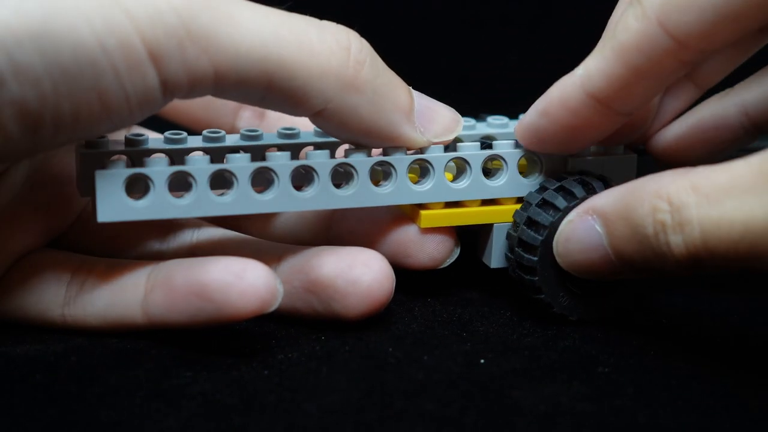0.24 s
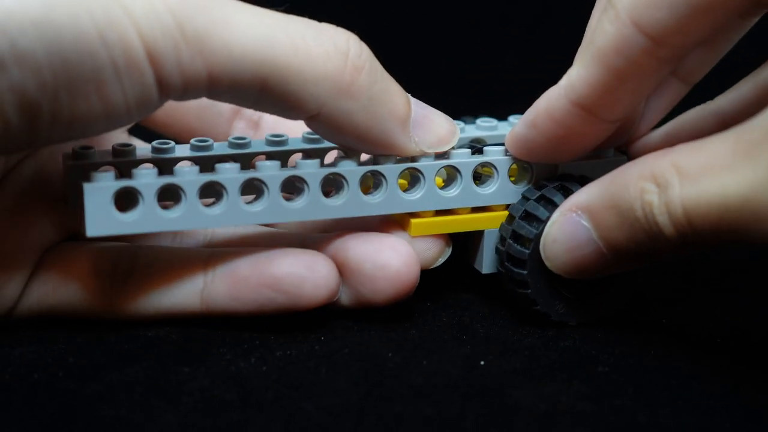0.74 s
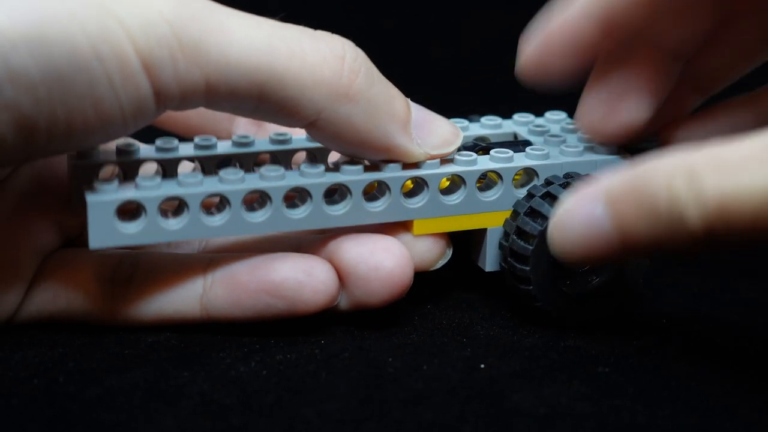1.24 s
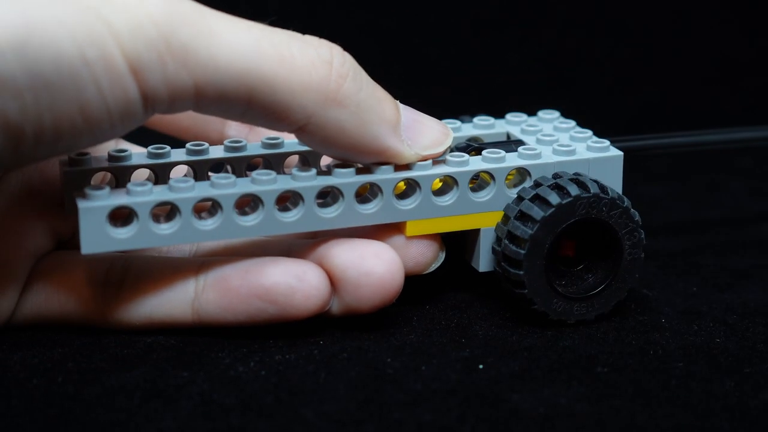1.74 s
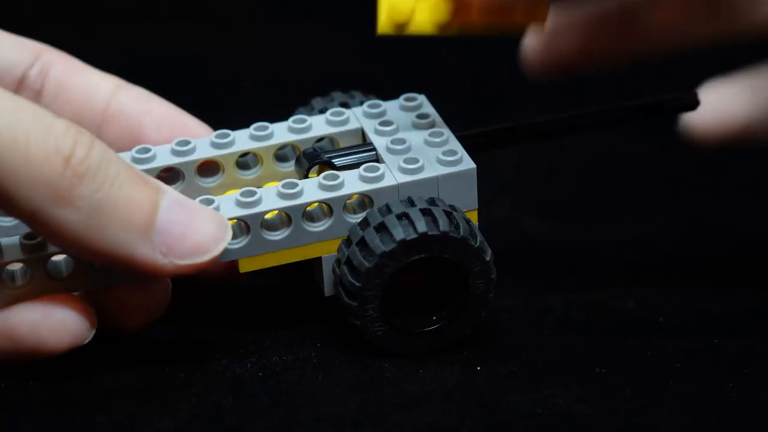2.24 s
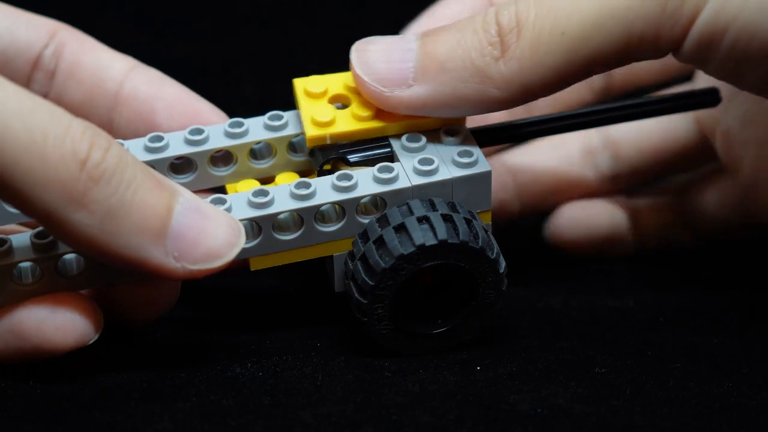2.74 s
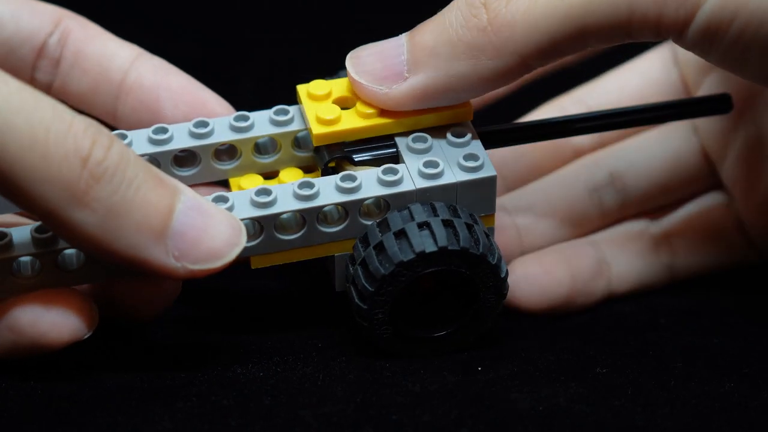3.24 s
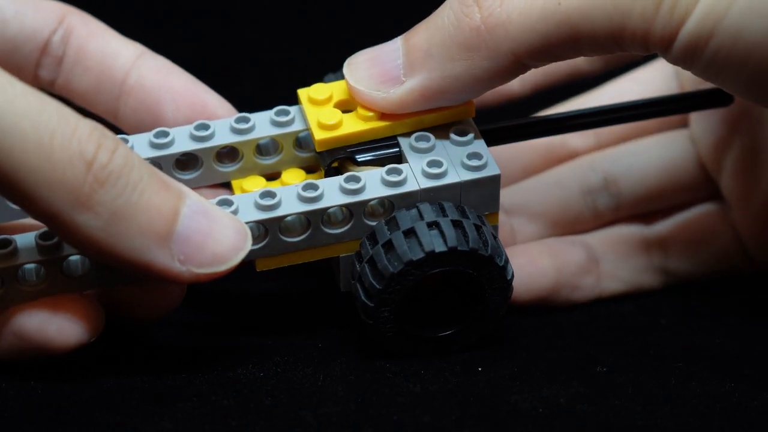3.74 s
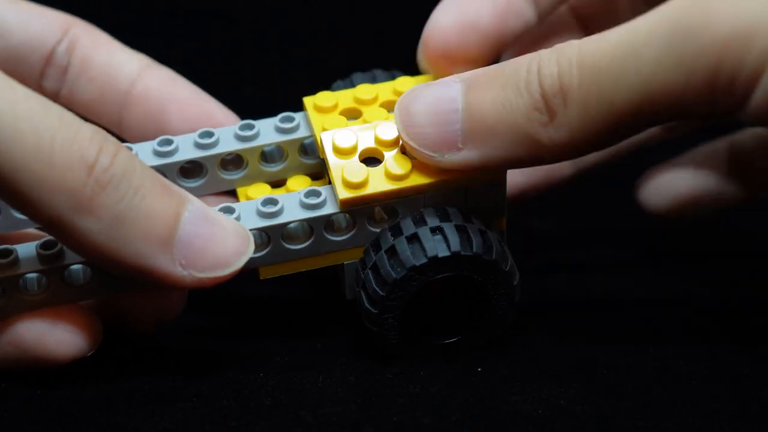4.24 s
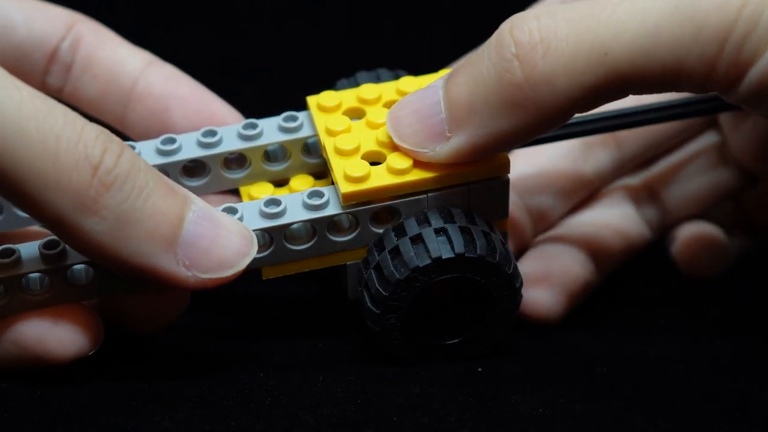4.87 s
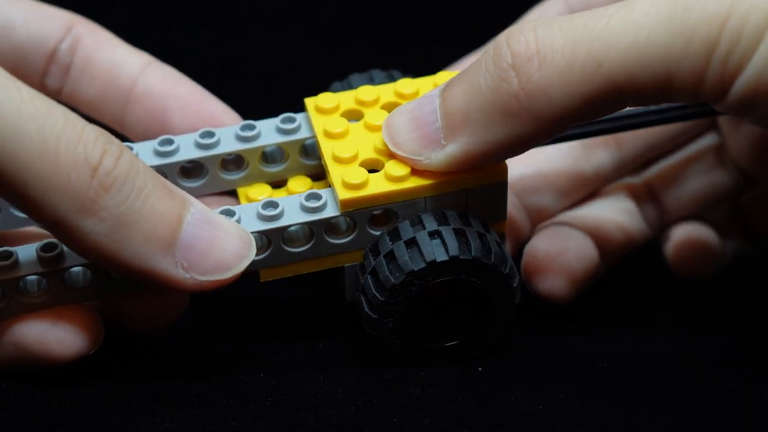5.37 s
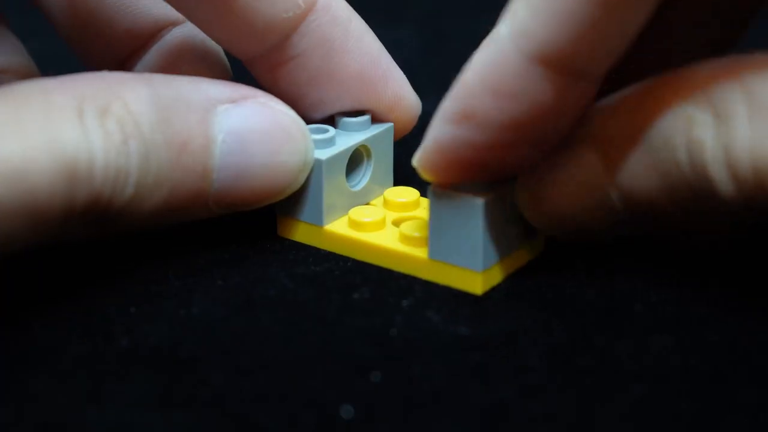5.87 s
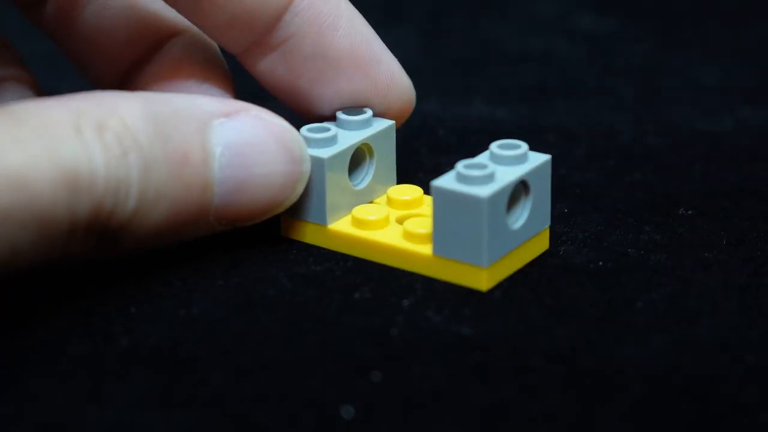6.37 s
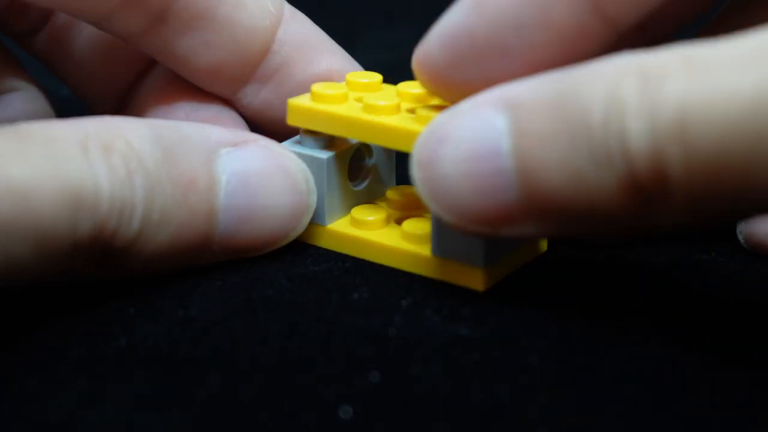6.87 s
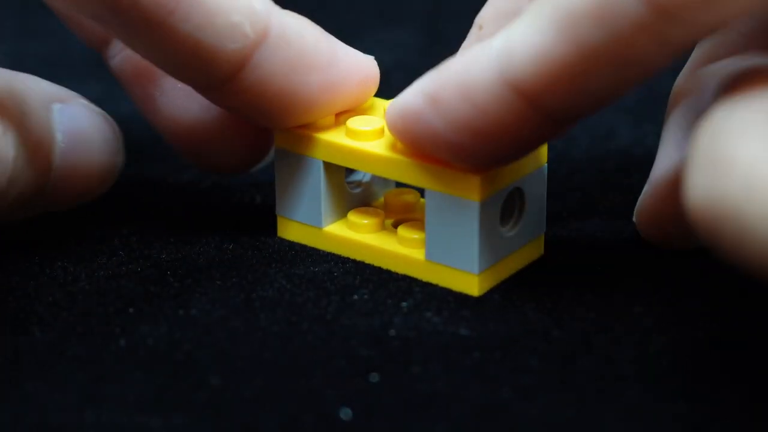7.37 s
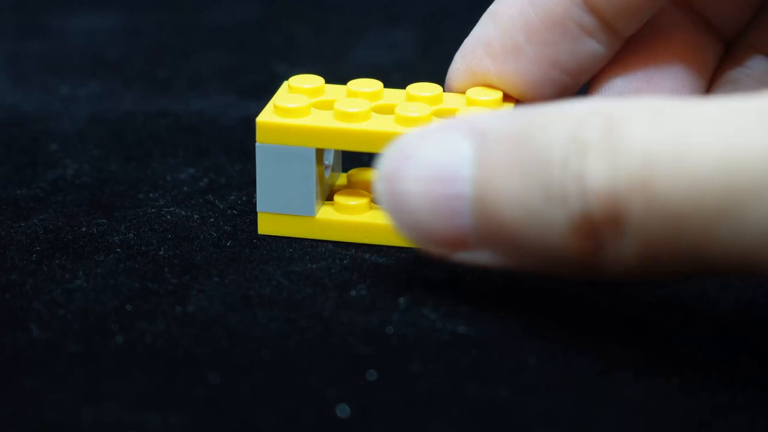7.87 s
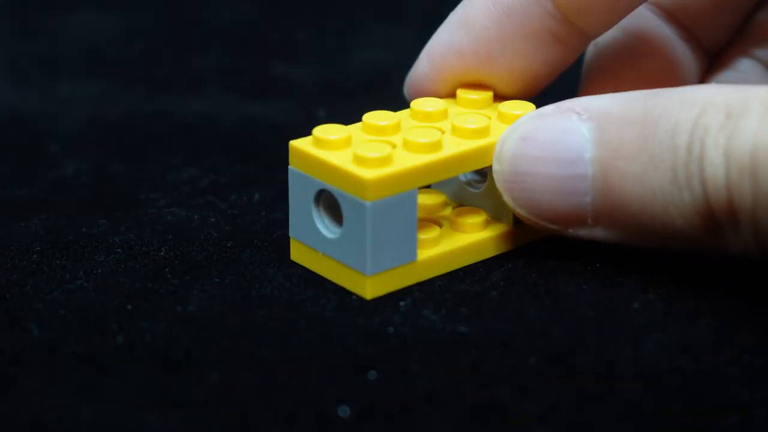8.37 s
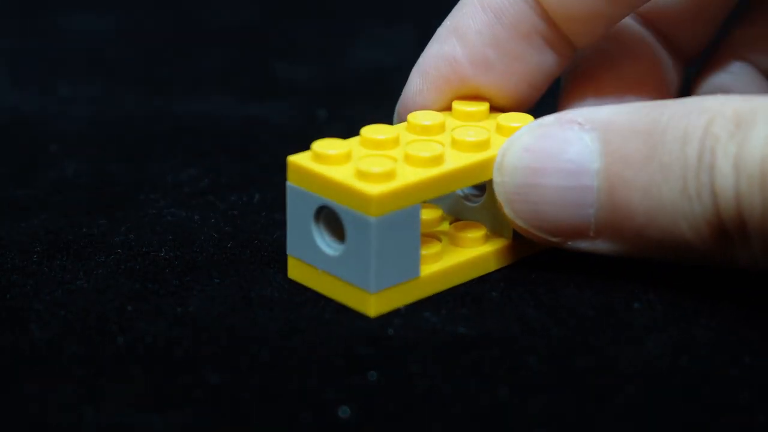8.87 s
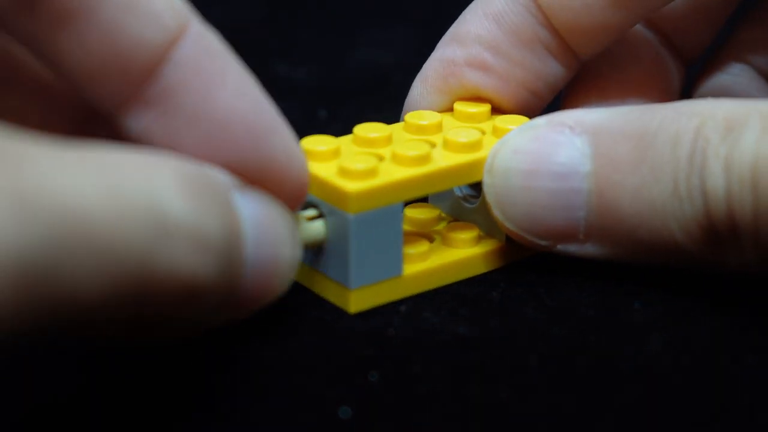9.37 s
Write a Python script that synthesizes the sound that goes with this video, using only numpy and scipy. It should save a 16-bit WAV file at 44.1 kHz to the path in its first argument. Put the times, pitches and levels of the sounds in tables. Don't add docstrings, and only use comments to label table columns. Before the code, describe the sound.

Hands assemble small plastic bricks close to a stereo microphone in a quiet room. One very loud snap with a table thump comes early, followed by scuffing fingertips, then a quick burst of bright clicks as a plate is pressed on. Later a smaller piece clicks shorter and drier, with a sharp seating snap and a firm double press. A peg clicks and squeaks faintly near the end. A low fan hum and soft hiss continue throughout.

```python
import sys
import numpy as np
from scipy import signal
from scipy.fft import rfft, irfft, next_fast_len
from scipy.io import wavfile
from scipy.ndimage import uniform_filter1d

SR = 44100
rng = np.random.default_rng(int(sys.argv[2]) if len(sys.argv) > 2 else 0)


def wav_record(signal):
    frames = np.transpose(np.atleast_2d(signal))
    bounded = np.clip(frames, -1, 1)
    quanta = np.round(bounded * 32767).astype(np.int16)
    wavfile.write(sys.argv[1], SR, quanta)


def magnitude_from_level(level_db):
    exponent = np.asarray(level_db, float) / 20
    return 10 ** exponent


N = 423801
T = np.arange(N) / SR
LEFT_RIGHT = np.array([[1], [-1]])
SETUP_S = 5.6

# start_s, pitch_hz, level_db
FAN_HUM = [(0, 193.8, -53), (.4, 192.5, -61), (.65, 192.5, -52), (1.15, 192.3, -51.5), (1.75, 192, -53.5),
           (2.3, 192, -51), (3.8, 194.6, -52), (4.07, 191.5, -47), (4.65, 192.7, -55), (5.17, 184, -45),
           (5.4, 188, -52.5), (5.9, 189.9, -50.5), (6.55, 185.5, -53), (6.9, 167, -45.5),
           (7.12, 166.7, -43), (7.7, 170, -50), (8.0, 186.4, -51.5), (9.61, 193, -56)]


def unit(x):
    return x / np.sqrt(np.mean(x ** 2))


def on_log(table, hz):
    table_hz, db = np.transpose(table)
    return np.interp(np.log(hz + 1e-9), np.log(table_hz), db)


def ring(x, modes, flip=-1):
    total = 0
    for k, (hz, width_hz, db) in enumerate(modes):
        b, a = signal.iirpeak(hz, hz / width_hz, fs=SR)
        total = total + flip ** k * magnitude_from_level(db) * signal.lfilter(b, a, x)
    return total


def bandpass(x, low_hz, high_hz):
    b, a = signal.butter(2, (low_hz, high_hz), "band", fs=SR)
    return signal.lfilter(b, a, x)


def decay(t, t60_s):
    return np.exp(-np.log(1000) * t / t60_s)


def walk(rate_hz):
    hold = int(SR / rate_hz)
    steps = np.repeat(rng.standard_normal(N // hold + 1), hold)
    return 1.9 * uniform_filter1d(uniform_filter1d(steps, hold), hold)[:N]


def air(colour):
    # pitch_hz, level_db
    stereo_width = [(60, -23), (110, -15), (200, -20.5), (380, -9.5), (1000, -6.5), (2380, -4.5), (8120, 0),
                    (15000, 1)]
    n = next_fast_len(N)
    hz = np.fft.rfftfreq(n, 1 / SR)
    mid, side = rfft(rng.standard_normal((2, n))) * colour(hz)
    side = side * magnitude_from_level(on_log(stereo_width, hz))
    return unit(irfft(mid + LEFT_RIGHT * side, n)[:, :N])


def add(out, start_s, sound):
    i = max(int(start_s * SR), 0)
    out[:, i:i + sound.shape[-1]] += sound[..., :N - i]


def camera_db():
    start_s, _, hum_db = np.transpose(FAN_HUM)
    lean_db = 0.051 * (np.interp(T, start_s, hum_db) - np.mean(hum_db))
    return -50 - 2.5 * (T > SETUP_S) + lean_db


def microphone_hiss(rush_db):
    # pitch_hz, level_db (per Hz)
    hiss_spectrum = [(880, -13), (1500, 3), (1990, -4), (2200, -2.5), (4660, -12.5), (12500, -15.5),
                     (15200, -17), (16500, -45)]

    def colour(hz):
        return magnitude_from_level(on_log(hiss_spectrum, hz)) * np.clip(hz / 3500, 0, 1) ** 0.74

    return magnitude_from_level(-60 + 1.2 * (rush_db + 53)) * air(colour)


def far_traffic():
    peak_s, spread_s, level_db = 5.8, 1, -57.5
    modes = [(70, 90, 0)]  # pitch_hz, width_hz, level_db
    swell = np.exp(-((T - peak_s) / spread_s) ** 2 / 2)
    return magnitude_from_level(level_db) * swell * unit(ring(ring(rng.standard_normal(N), modes), modes))


def fan(rush_db):
    # pitch_hz, width_hz, level_db
    room_modes = [(89, 27, -12.5), (127.8, 23, -5), (255.7, 13, -6), (323.5, 43, -14)]
    # pitch_hz, level_db (per Hz)
    rush_spectrum = [(15, -61), (25, -21.5), (86, -9.5), (119, -3), (157, -8), (188, 4.5), (221, -1.5),
                     (259, -1.5), (357, -10.5), (439, -8), (482, -15), (728, -13.5), (6000, -30.5),
                     (7800, -35), (13200, -120)]
    start_s, pitch_hz, level_db = np.transpose(FAN_HUM)
    hz = np.interp(T, start_s, pitch_hz)
    main_db = np.interp(T, start_s, level_db)
    slow = signal.lfilter([1], [1, -np.exp(-np.pi * 11 / SR)], rng.standard_normal((2, N)))
    phase = 2 * np.pi * np.cumsum(hz) / SR
    main = unit(slow[0] * np.cos(phase) + slow[1] * np.sin(phase))
    flank = 0
    for mode_hz, width_hz, db in room_modes:
        tone = unit(ring(rng.standard_normal(N), [(mode_hz, width_hz, 0)]))
        flank = flank + magnitude_from_level(db + 1.5 * walk(1.228)) * tone
    rush = air(lambda f: magnitude_from_level(on_log(rush_spectrum, f)))
    rush_gain = magnitude_from_level(rush_db + 4.5 + 0.64 * walk(3.74))
    return magnitude_from_level(main_db + 3) * main + magnitude_from_level(rush_db + 2) * flank + rush_gain * rush


def room(x, gap_s, t60_low_s, t60_high_s, wet_db):
    t = np.arange(SR // 2) / SR
    mid, side = rng.standard_normal((2, len(t)))
    noise = mid + LEFT_RIGHT * magnitude_from_level(-9) * side
    low = signal.lfilter(*signal.butter(1, 3000, fs=SR), noise)
    tail = low * decay(t, t60_low_s) + (noise - low) * decay(t, t60_high_s)
    tail = tail * np.clip(t / gap_s - 1, 0, 1)
    tail = tail / np.sqrt(np.sum(tail ** 2) / 2)
    return magnitude_from_level(wet_db) * signal.fftconvolve(x, tail, axes=1)[:, :N]


def peg_squeak():
    # start_s, length_s, partial_ratio, level_db
    bursts = [
        (9.493, .035, 1, -68),
        (9.52, .04, 1, -76),
        (9.553, .08, 1, -68),
        (9.518, .038, 1.138, -63),
        (9.55, .045, 1.138, -64),
        (9.59, .03, 1.138, -69),
    ]
    from_hz, to_hz, mid_s, bend_s = 8950, 10330, 9.537, .02
    hz = from_hz + (to_hz - from_hz) * (1 + np.tanh((T - mid_s) / bend_s)) / 2
    out = 0
    for start_s, length_s, ratio, db in bursts:
        swell = np.sin(np.pi * np.clip((T - start_s) / length_s, 0, 1)) ** .6
        phase = np.cumsum(ratio * hz * (1 + .004 * walk(300))) / SR
        out = out + np.sqrt(2) * swell * magnitude_from_level(db + 1.9 * walk(80)) * np.sin(2 * np.pi * phase)
    return out


def rubbing(strokes, zones, outer_db):
    attack, release = 0.21, 0.26
    fade_db, patchy_db = 14, 1
    brightens_db = 3
    out = np.zeros((2, N))
    for start_s, length_s, db, tilt_db in strokes:
        u = np.linspace(0, 1, int(length_s * 1.5 * SR)) * 1.5 - .25
        press = np.minimum(np.minimum(u / attack, (1 - u) / release), 1)
        edge = np.clip(np.minimum(u + .25, 1.25 - u) * length_s / .003, 0, 1)
        for step, modes in zip((-1, 0, 1), zones):
            size, mid, side = rng.standard_normal((3, SR // 2))[:, :len(u)]
            grain = mid + LEFT_RIGHT * magnitude_from_level(-6.5) * side
            grain = grain * magnitude_from_level(1.7 * uniform_filter1d(size, 100) * 10)
            zone_db = db + patchy_db * uniform_filter1d(size, size=900) * 30
            zone_db = zone_db + step * (tilt_db + brightens_db * (u - .5)) + abs(step) * outer_db
            zone_db = zone_db + fade_db * (press - 1)
            add(out, start_s - length_s / 4, edge * magnitude_from_level(zone_db) * unit(ring(grain, modes)))
    return out


def fingertips():
    # start_s, length_s, level_db, tilt_db (per zone)
    frame_strokes = [(.455, 0.1, -57.5, 1.5), (.622, .075, -54.5, 0), (.7, .06, -59.5, -2),
                     (1.38, 0.2, -48.5, -6), (2.15, 0.038, -67, 2), (2.28, .2, -69, -7),
                     (2.61, 0.074, -55, 3), (2.69, 0.075, -52, 2.5), (2.76, 0.091, -52.5, 1),
                     (2.94, .06, -54.5, 0), (3.03, 0.11, -55.5, -1), (3.13, 0.085, -57, -1.5),
                     (3.24, 0.057, -55.5, 0), (4.4, .27, -57, -3), (4.68, .09, -60, -1)]
    # start_s, length_s, level_db, tilt_db (per zone)
    box_strokes = [(6.245, .07, -66, 1), (6.38, 0.031, -63, -2), (6.5, 0.14, -53.5, -1),
                   (6.9, 0.055, -66, -9), (6.99, 0.045, -57, 3), (7.58, 0.093, -59.5, -3),
                   (7.71, .045, -63, -12.5), (7.78, .06, -56.5, -8.5), (7.87, 0.05, -58.5, -8),
                   (7.94, .24, -64.5, -6), (8.46, .07, -59, -4), (9.092, 0.064, -56, -11),
                   (9.2, .12, -69, -9)]
    # pitch_hz, width_hz, level_db
    skin_on_frame = [(3100, 310, 3.5), (3900, 450, 1), (4470, 300, 4.5), (5600, 260, 3.5)]
    # pitch_hz, width_hz, level_db
    skin_on_box = [(4540, 1100, 14.5), (6100, 660, 11)]
    # pitch_hz, width_hz, level_db
    high = [(6400, 440, 0.11), (7500, 330, 2.5), (8340, 290, 1), (9120, 360, 0.5)]
    # pitch_hz, width_hz, level_db
    top = [(10130, 1500, 1.5), (12800, 1700, 0), (14500, 1500, -1)]
    on_frame = rubbing(frame_strokes, (skin_on_frame, high, top), outer_db=-1.5)
    return on_frame + rubbing(box_strokes, (skin_on_box, high, top), outer_db=-5)


def table_top():
    # start_s, peak_db, pitch_hz, t60_s
    thumps = [(.826, -18, 557, 0.074), (.826, -23, 171.5, 0.23), (.841, -13.5, 290, 0.12),
              (.866, -29, 278, 0.11), (.845, -34, 600, 0.12), (5.133, -23, 180, 0.059),
              (5.134, -41, 580, 0.12), (5.220, -23, 182.6, 0.14), (5.825, -31.5, 273, 0.097),
              (5.827, -33, 180, 0.085), (0.828, -27.5, 430, 0.069), (0.832, -31, 126, 0.14),
              (0.881, -15.5, 250, 0.037), (9.424, -41.5, 560, 0.053), (5.824, -35, 553, 0.033),
              (7.25, -35, 252, 0.058), (8.94, -44, 892, 0.058), (9.555, -43, 908, 0.037)]
    out, t = np.zeros((2, N)), np.arange(SR // 4) / SR
    chance = rng.standard_normal((len(thumps), 2, len(t)))
    chance = uniform_filter1d(chance, 220, axis=2) * np.sqrt(220)
    for (start_s, db, hz, t60_s), (swell, waver) in zip(thumps, chance):
        phase = 2 * np.pi * np.cumsum(hz * (1 + 0.036 * waver)) / SR
        onset = 1 - np.exp(-t * hz * 3)
        add(out, start_s, magnitude_from_level(db + 4.2 * swell) * onset * decay(t, t60_s) * np.sin(phase))
    return out


def snaps(events, modes, rise_s, fall_s, grit_db, main_db, main_width_hz, lift_db, top_db, dull_hz,
          side_db, pan_db):
    # pitch_hz, width_hz, level_db
    crack = [(2140, 2600, -3.5), (4120, 4300, 3), (7560, 3300, -5), (11300, 8000, -8)]
    borders = (0, 2800, 6000, 10000, 20000)
    out, t = np.zeros((2, N)), np.arange(1500) / SR
    shape = (t / rise_s) ** 1.8 / (1 + (t / rise_s) ** 0.87) * np.exp(-t / fall_s)
    window = np.clip(t / 0.00049, 0, 1) * np.clip(2 - t / 0.016, 0, 1)
    chance = rng.standard_normal((len(events), 3, 1500))
    for (start_s, db, loudest_hz, low_db, high_db), (size, mid, side) in zip(events, chance):
        slips = shape * magnitude_from_level(grit_db * size) * np.array([mid, magnitude_from_level(side_db) * side])
        force = rfft(slips)
        slips = irfft(force / uniform_filter1d(np.abs(force[0]), size=9)) * window
        grip = [(hz * (1 + .015 * a), 1.5 * width_hz, mode_db + 1.5 * b)
                for (hz, width_hz, mode_db), a, b in zip(modes, size[-40:], size[-80:])]
        others = [mode for mode in grip if abs(mode[0] - loudest_hz) > 350]
        every = sorted(others + [(loudest_hz, main_width_hz, main_db)]) + crack
        body, treble, sizzle = magnitude_from_level(np.array([low_db, high_db, high_db + top_db]) + lift_db)
        middle = np.sqrt(max(1 - body ** 2 - treble ** 2 - sizzle ** 2, .2))
        both = 0
        for share, lo, hi in zip((body, middle, treble, sizzle), borders, borders[1:]):
            sharp = slips * np.exp(-t * lo / 45)
            zone = ring(sharp, [mode for mode in every if lo <= mode[0] < hi], flip=0.7)
            zone = bandpass(zone, max(0.36 * lo, 500), min(hi + dull_hz, 20000))
            both = both + share * zone / np.abs(zone[0]).max()
        loudness = 2.6 * uniform_filter1d(both[0] ** 2, size=50).max() ** .5
        stereo = both[0] + LEFT_RIGHT * both[1]
        add(out, start_s - .0012, magnitude_from_level(db + LEFT_RIGHT * pan_db / 2) * stereo / loudness)
    return out


def box_snaps():
    # start_s, peak_db, loudest_mode_hz, body_db (re peak), treble_db (re peak)
    presses = [(5.7742, -23, 2830, -8.5, -30), (5.9625, -37.5, 7410, -15, -8.5),
               (6.347, -41, 3720, -22, -9), (6.4837, -38.5, 6360, -23, 3), (6.84, -35.5, 5660, -10.5, -23),
               (6.9653, -32, 4994, -14, -19), (6.984, -24.5, 4330, -15, -13),
               (7.1711, -38.5, 2050, -5, -10), (7.2204, -30, 2070, -10, -10.5),
               (7.2477, -14.5, 2070, -14.5, -11), (7.2858, -16.5, 2094, -11.5, -10.5),
               (7.5194, -42, 1940, -12, -21), (8.5786, -39.5, 1843, 14, -17),
               (9.423, -20, 4540, -16.5, -26), (9.5535, -39, 1877, -9, -14)]
    # start_s, peak_db, loudest_mode_hz, body_db (re peak), treble_db (re peak)
    click_home = [
        (5.8241, -10.5, 3350, -12, -28),
    ]
    # pitch_hz, width_hz, level_db
    modes = [(870, 420, -8), (1310, 90, -5.5), (2100, 290, 0.5), (3000, 370, -5.5), (3680, 420, -3.5),
             (4440, 140, -17), (4920, 810, 5), (5750, 62, -4), (5860, 2400, 0), (8000, 240, 2),
             (8800, 190, -6), (10000, 2200, 12), (12100, 530, -25), (12900, 1100, -27)]
    out = snaps(presses, modes, rise_s=.0007, fall_s=0.0026, grit_db=6.0, main_db=10.0, main_width_hz=170,
                lift_db=5.0, top_db=-4.5, dull_hz=2020, side_db=-13.0, pan_db=-1.5)
    out += snaps(click_home, modes, rise_s=.00015, fall_s=0.0018, grit_db=6.0, main_db=25.0,
                 main_width_hz=1700, lift_db=3.0, top_db=9, dull_hz=600, side_db=-19.0, pan_db=-1.5)
    return out


def frame_snaps():
    # start_s, peak_db, loudest_mode_hz, body_db (re peak), treble_db (re peak)
    presses = [(0.0014, -40, 3660, -23, -12.5), (0.1156, -27, 3340, -23, -30),
               (0.556, -23.5, 9600, -21, -9), (0.653, -25, 3380, -25, -13.5), (0.7344, -44, 5330, -19, -15),
               (0.8253, -2.5, 3320, -25.5, -14), (1.2484, -28.5, 3520, -26, -14),
               (1.2928, -27.5, 2660, -16.5, -17), (2.477, -33.5, 3290, -17, -15),
               (2.7646, -33.5, 3680, -18, -14), (2.8055, -27.5, 3730, -6, -27)]
    # start_s, peak_db, loudest_mode_hz, body_db (re peak), treble_db (re peak)
    plate_presses = [(3.689, -18, 8670, -43, -10), (3.7389, -30, 6500, -19, -13),
                     (3.7744, -16, 5750, -41, -10), (3.8033, -32, 2720, -16, -19),
                     (3.8606, -11, 6820, -45, -11.5), (3.8794, -6, 3400, -29.5, -13),
                     (3.9242, -13.5, 5400, -28, -13), (3.9629, -12.5, 5100, -31, -12.5),
                     (4.2812, -38, 3620, -9, -20), (4.952, -29, 6700, -16, -14),
                     (4.9736, -37, 7350, -12, -11), (4.9965, -33, 4200, -20, -14.5),
                     (5.03, -29, 3780, -20, -15), (5.074, -23, 3640, -26, -13),
                     (5.1312, -15, 3750, -19.5, -12), (5.219, -12, 7200, -41, -12)]
    # pitch_hz, width_hz, level_db
    modes = [(1180, 62, -42), (1610, 140, -10), (2160, 67, -7), (2550, 36, -2.5), (3330, 90, 8.5),
             (3880, 200, 5.5), (5100, 1070, 10.5), (6240, 1300, 5.5), (7340, 1300, 6.5), (8200, 120, 11),
             (9300, 600, 13), (10100, 680, -13), (11540, 780, -14), (14000, 230, -17)]
    out = snaps(presses, modes, rise_s=0.0013, fall_s=0.0026, grit_db=6.0, main_db=17.5, main_width_hz=350,
                lift_db=9.5, top_db=-2.5, dull_hz=2260, side_db=-14.5, pan_db=0.0)
    out += snaps(plate_presses, modes, rise_s=0.00048, fall_s=0.0023, grit_db=-1.0, main_db=16.5,
                 main_width_hz=380, lift_db=9.5, top_db=-4.5, dull_hz=6400, side_db=-11.0, pan_db=-0.2)
    return out


def scene():
    rush_db = camera_db()
    background = microphone_hiss(rush_db) + far_traffic() + fan(rush_db)
    bricks = bandpass(frame_snaps() + box_snaps(), 110, 15000)
    thumps = bandpass(table_top(), 110, 15000)
    sent = (bricks + magnitude_from_level(-12) * thumps) * np.where(T < SETUP_S, 1, magnitude_from_level(-12.0))
    walls = room(sent, gap_s=0.0065, t60_low_s=0.27, t60_high_s=0.25, wet_db=-17.5)
    return background + walls + peg_squeak() + fingertips() + thumps + bricks


def band_limit(x):
    return signal.sosfilt(signal.butter(12, 16650, fs=SR, output="sos"), x)


def record(dry):
    rounded = .8 * np.tanh(dry / .8)
    top_cut = signal.ellip(8, .2, 50, 16100, fs=SR, output="sos")
    return band_limit(signal.sosfilt(top_cut, rounded))


dry = scene()
out = record(dry)
wav_record(out)
```